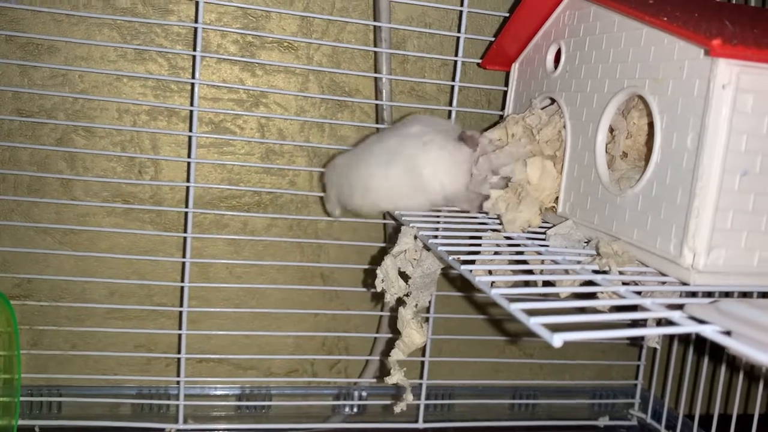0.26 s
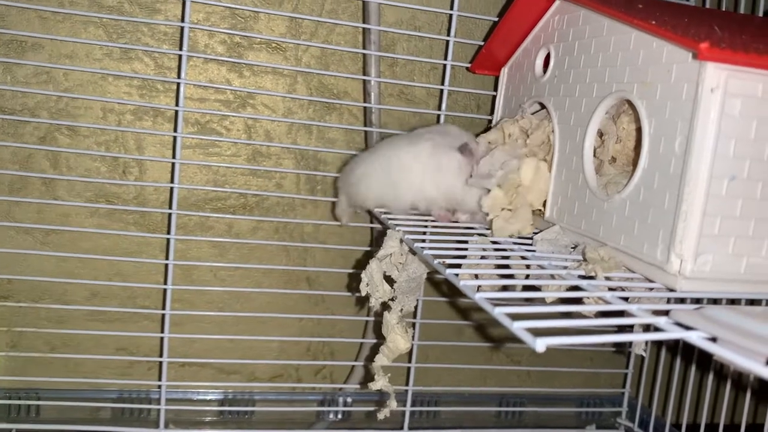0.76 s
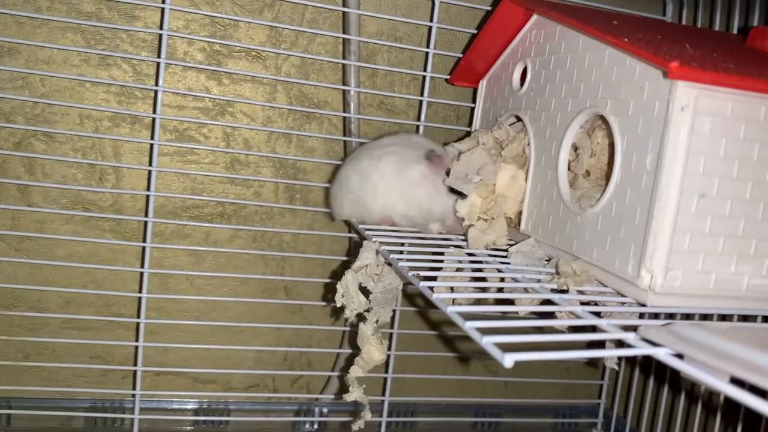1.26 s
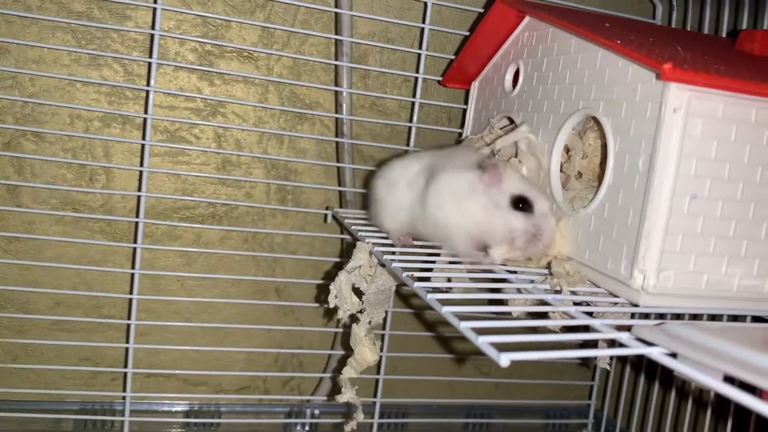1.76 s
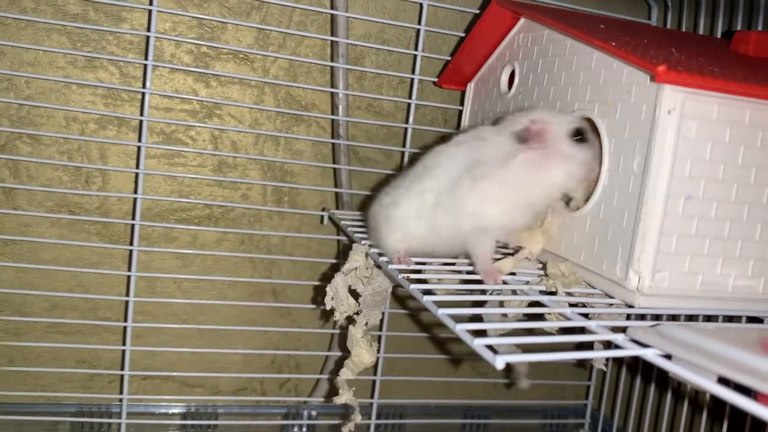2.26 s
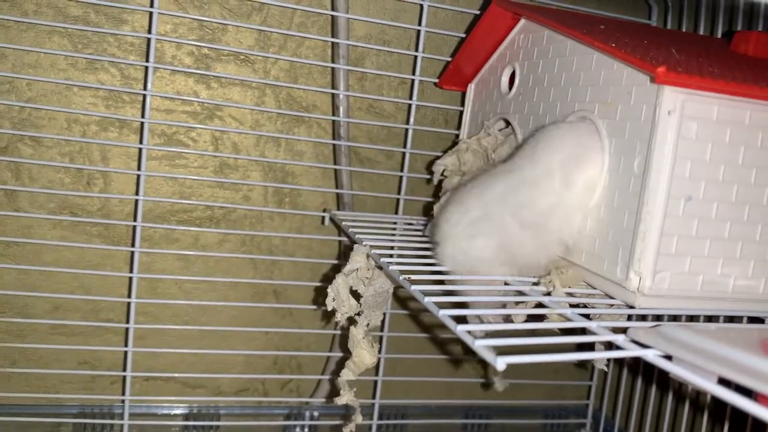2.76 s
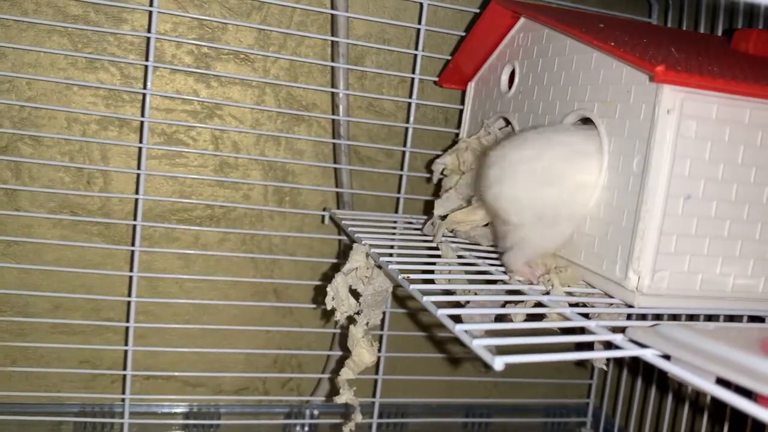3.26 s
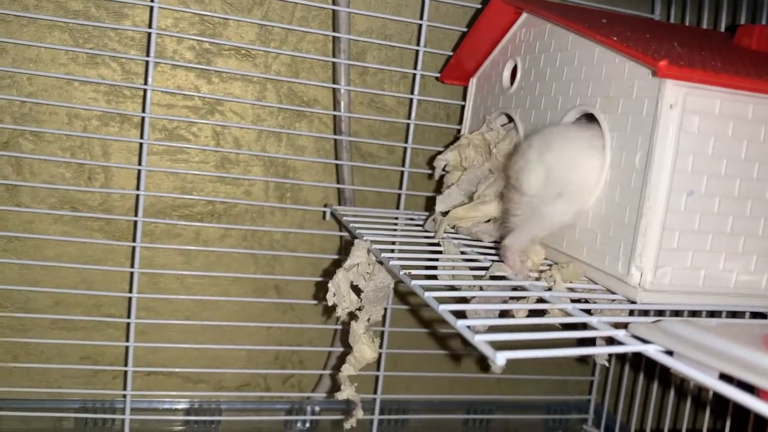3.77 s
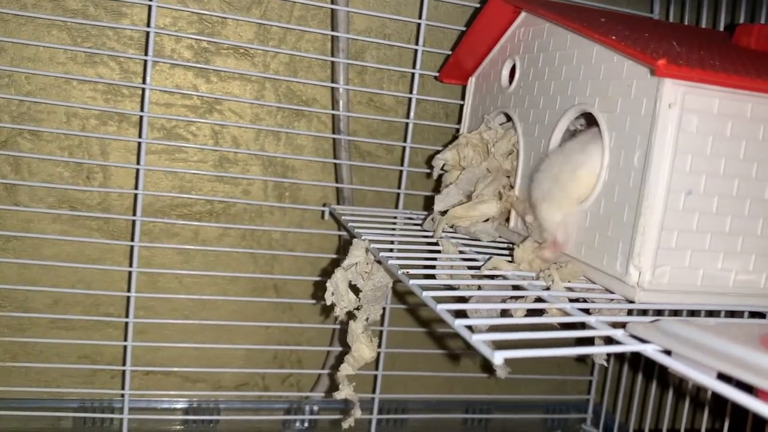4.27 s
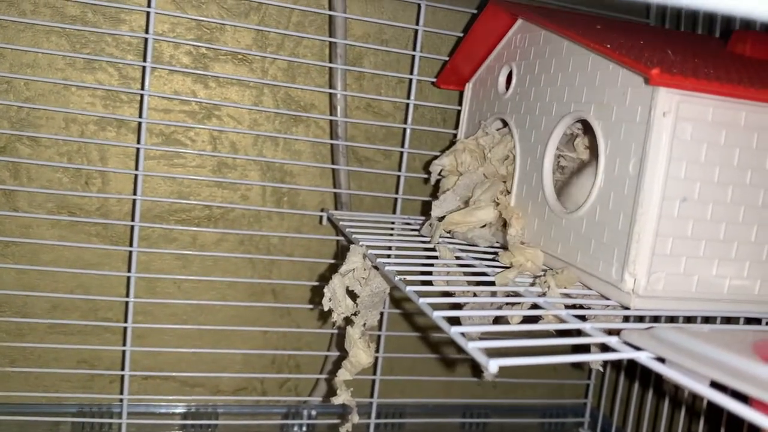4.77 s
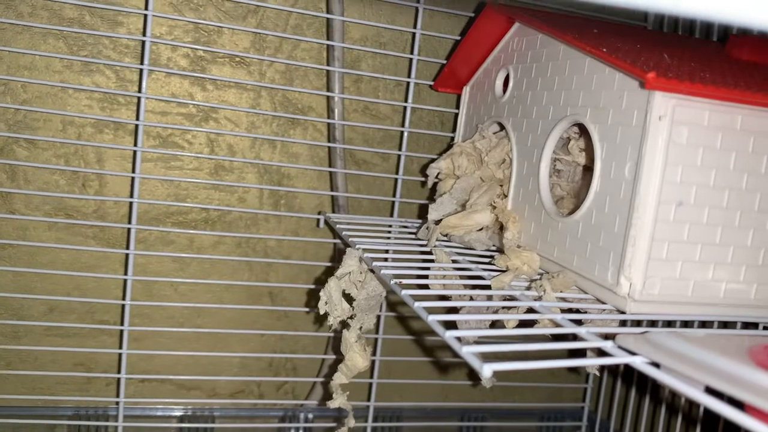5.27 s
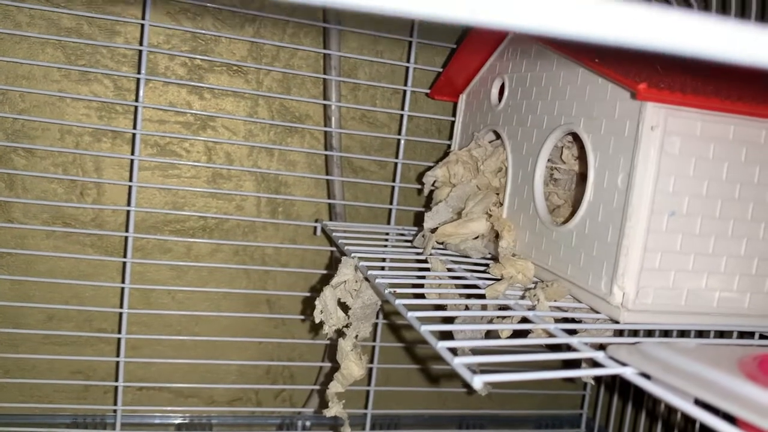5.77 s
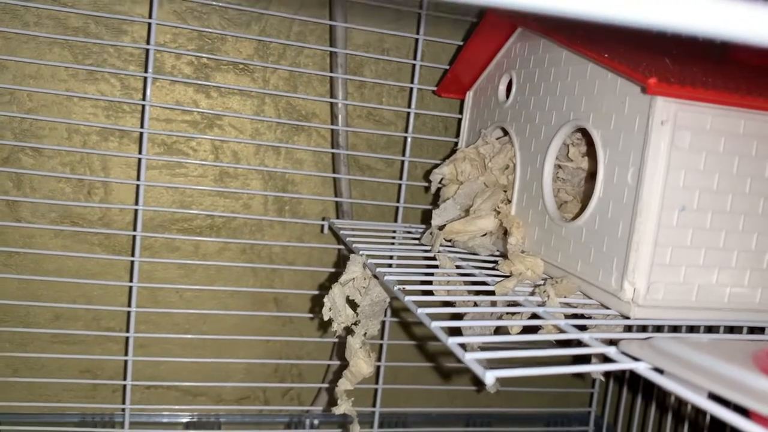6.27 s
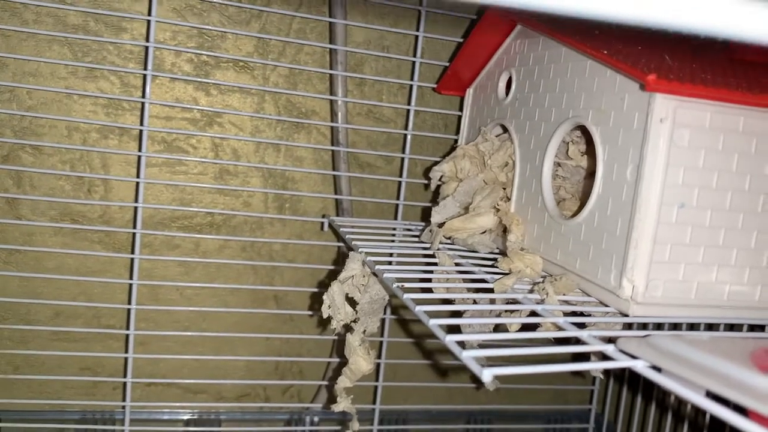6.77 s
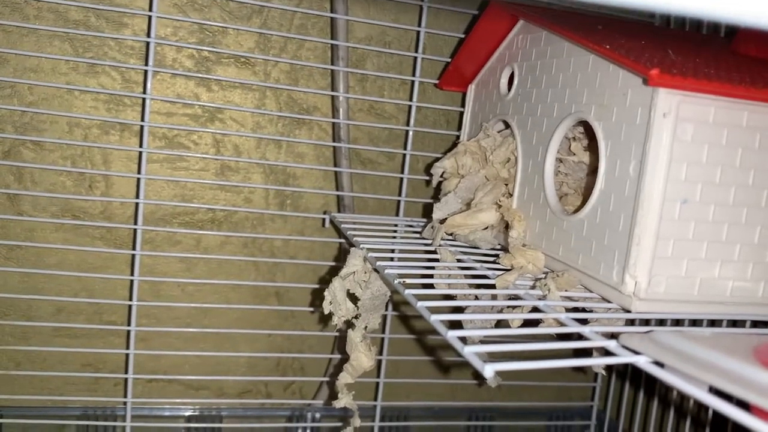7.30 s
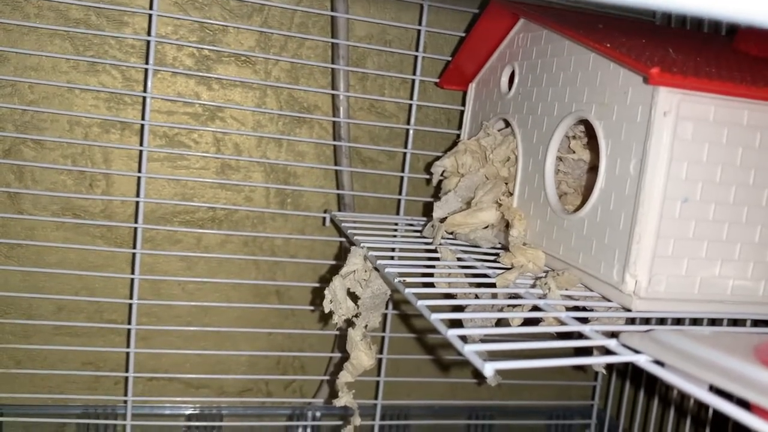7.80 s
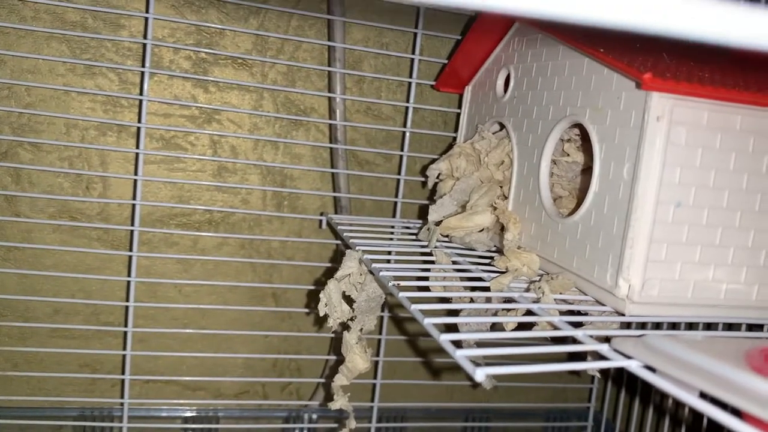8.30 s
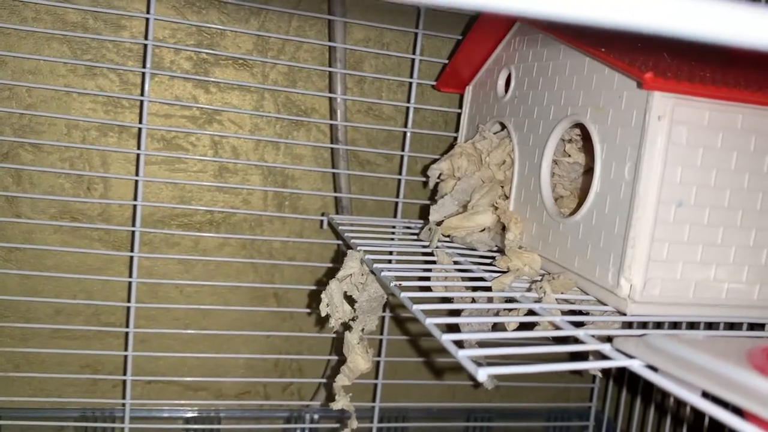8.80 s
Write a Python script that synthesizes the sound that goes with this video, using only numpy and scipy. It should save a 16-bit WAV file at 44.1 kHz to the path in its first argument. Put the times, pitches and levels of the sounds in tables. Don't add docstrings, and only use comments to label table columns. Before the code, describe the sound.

A small rodent rustles and snaps dry paper bedding with light paw bumps on wire and plastic, over a steady low electrical hum.

```python
import sys
import numpy as np
from scipy import signal
from scipy.fft import rfft, irfft, next_fast_len
from scipy.io import wavfile
from scipy.ndimage import uniform_filter1d

SR = 44100
rng = np.random.default_rng(int(sys.argv[2]) if len(sys.argv) > 2 else 0)


def natural_amplitude(level_db):
    exponent = np.asarray(level_db, float) / 20
    return 10 ** exponent


def digitize_waveform(pressure):
    field = np.atleast_2d(pressure).T
    bounded = np.clip(field, -1, 1)
    quanta = np.round(bounded * 32767).astype(np.int16)
    wavfile.write(sys.argv[1], SR, quanta)


N = 398884


def evened(x):
    return x / np.sqrt(np.mean(x ** 2) + 1e-20)


def read(points, hz):
    f, value = np.transpose(points)
    return np.interp(np.log(hz + 1), np.log(f + 1), value)


def curves(rows):
    s, *columns = np.transpose(rows)
    return [np.interp(np.arange(N) / SR, s, c) for c in columns]


def colour(x, points):
    size = next_fast_len(len(x))
    gain = natural_amplitude(read(points, np.fft.rfftfreq(size, 1 / SR)))
    return irfft(rfft(x, size) * gain, size)[:len(x)]


def resonate(x, hz, width_hz):
    b, a = signal.iirpeak(hz, hz / width_hz, SR)
    return signal.lfilter(b, a, signal.lfilter(b, a, x))


def drift(rate_hz):
    length = max(2, int(SR / 64 / rate_hz))
    steps = uniform_filter1d(rng.standard_normal(N // 64 + 2), length, mode="wrap")
    return np.interp(np.arange(N) / 64, np.arange(len(steps)), evened(steps))


def rattling(length, smooth, depth_db):
    waver = evened(uniform_filter1d(rng.standard_normal(length), smooth))
    return rng.standard_normal(length) * natural_amplitude(depth_db * waver)


def add(mix, s, sound):
    part = mix[round(s * SR):][:len(sound)]
    part += sound[:len(part)]


def tone(hz, db, lead_rad=0.38, lean_db=9.0, waver_db=1.0, rate_hz=3.3):
    turn = 2 * np.pi * (np.cumsum(hz * np.ones(N)) / SR + rng.random())
    size = np.sqrt(2) * natural_amplitude(db + waver_db * drift(rate_hz))
    left = np.sin(turn) * natural_amplitude(lean_db / 2)
    right = np.sin(turn - lead_rad) / natural_amplitude(lean_db / 2)
    return size * np.array([left, right])


# [t/s, level/dB]
MAINS_HUM = [(0, -47), (.75, -43.5), (1.7, -45), (2.7, -47), (3.7, -51), (4.7, -55.5), (5.2, -55),
             (5.8, -49.5), (6.5, -47.5), (7.1, -46.5), (7.6, -45), (8.2, -45.5), (8.6, -44.5), (9.04, -44)]
# [f/Hz, level/dB, waver width/Hz]
STEADY_TONES = [(99.7, -56.5, 0.77), (177.8, -67, 4)]
# [t/s, level/dB]
PUMP_TONE = [(0, -69.5), (1.6, -66), (2.3, -67.5), (3.3, -73.5), (3.8, -63.5), (4.9, -71), (5.5, -70),
             (6.2, -65), (7.2, -61), (7.7, -79), (9.04, -72)]
# [f/Hz, level/dB]
FAINT_TONES = [(1066, -93), (1550, -96), (2482, -102), (3413, -105), (4344, -108), (11278, -105),
               (11343, -104)]
# [t/s, f/Hz, level/dB]
SLOW_WHINE = [(0, 272, -63), (.6, 281, -70), (1.1, 291, -70), (1.4, 297, -61), (1.75, 303, -57),
              (2.25, 307.5, -59), (3, 310, -61), (4, 310.7, -61), (6.8, 311, -61), (7.3, 314.5, -56),
              (7.75, 319, -57), (8.25, 323, -59), (9.04, 318, -57)]
FAST_WHINE = [(0, 360.3, -65), (1.9, 360.2, -65), (2.3, 358.6, -65), (3.2, 356, -68), (4, 355, -68),
              (6, 355, -68), (6.7, 356.5, -66), (7.2, 359, -64), (7.6, 360.6, -64), (9.04, 360.4, -64)]
# [multiple, level/dB]
WHINE_OVERTONES = [(1, 1), (2, -24), (4, -29.5)]


def machines():
    strain, strain_from_db = 1.2, -56.5
    out = tone(120, curves(MAINS_HUM)[0], lead_rad=.65, lean_db=5, waver_db=.3)
    for hz, db, width_hz in STEADY_TONES:
        out += tone(hz + 0.36 * width_hz * drift(width_hz), db, 1.0, 3.5, 3.3, width_hz)
    out += tone(233.8 + 1.1 * drift(3), curves(PUMP_TONE)[0], 0.53, 5.2, 0.81, 3)
    for hz, db in FAINT_TONES:
        apart = hz < 6000
        out += tone(hz + 4 * drift(6), db + 3.5, -1.5 * apart, 6.0 * apart, 2.5, 5)
    hz, db = curves(SLOW_WHINE)
    for k, over_db in WHINE_OVERTONES:
        strain_db = (k > 1) * strain * (db - strain_from_db)
        out += tone(k * hz, db + over_db + strain_db, 0.81, 3.5, 1.0, 4.4)
    return out + natural_amplitude(2.5) * tone(*curves(FAST_WHINE), -.6, 6.0, .7, 4)


# [f/Hz, level/dB per Hz]
ROOM_SPECTRUM = [(22, -108), (40, -82.5), (62, -72.5), (190, -77.5), (270, -87), (420, -93.5),
                 (660, -103.5), (770, -108.5), (1000, -107.5), (2050, -117), (2550, -115.5), (3100, -120),
                 (6100, -125), (8500, -122), (11000, -122), (15500, -126)]


def room():
    swell = natural_amplitude(.5 * drift(3) + .6 * drift(25))
    noise = rng.standard_normal((2, N)) * np.sqrt(SR / 2) * swell
    return np.array([colour(n, ROOM_SPECTRUM) for n in noise])


def slips(per_s, spread_db, clump_db, clumps_per_s):
    size = natural_amplitude(spread_db * np.minimum(rng.exponential(1, N), 5))
    size = size * (rng.random(N) < per_s / SR)
    return size * np.sign(rng.random(N) - .5) * natural_amplitude(clump_db * drift(clumps_per_s))


# [t/s, length/s, level/dB, crumple share/dB, mid fold share/dB]
PAW_STROKES = [(0.0, 0.047, -80.5, -7, 1), (0.374, 0.047, -77, 0, 4), (0.436, 0.062, -74, 0, 1),
               (0.52, 0.2, -80, 1, 2), (0.717, 0.032, -71, -8, 0), (0.743, 0.05, -68.5, -4, -6),
               (0.82, 0.053, -77, 1, -8), (0.875, 0.08, -75, 1, -2), (1.34, 0.059, -75.5, -5, 1),
               (1.422, 0.065, -64.5, -7.5, 0), (1.491, 0.049, -61, -7.5, -2), (1.564, 0.067, -64, -2.5, -3),
               (1.693, .04, -68, -3.5, -3), (1.754, 0.13, -70.5, -2, -11), (1.893, 0.12, -71.5, -1, -10),
               (2.011, 0.097, -69.5, -3, -11), (2.11, .04, -79, -6, -4), (2.158, 0.06, -76, -2, 0),
               (2.22, 0.05, -70.5, -5, -2), (2.248, 0.058, -66.5, -7, -3), (2.314, 0.038, -66, 1, 6),
               (2.372, 0.06, -71.5, 1, -4), (2.44, .04, -80, -6, -2), (2.496, 0.03, -77, 0, 1),
               (2.62, 0.11, -78, 0, 1), (3.042, 0.044, -79, -1, -2), (3.385, .03, -81, -8, -4),
               (3.64, 0.049, -80, 0, -2), (3.868, 0.047, -79.5, -1, -1), (4.025, 0.06, -76, -5, -3),
               (4.195, 0.13, -82, -3, 0), (4.40, 0.074, -79.5, -4, 0), (4.59, 0.12, -82, 3, 0),
               (5.62, 0.12, -83, 0, 1)]


def effort():
    grip_s, pull_db, let_go_db_per_s = 0.0064, 1, 511
    out = np.zeros((N, 3))
    for s, length_s, db, deep_db, mid_db in PAW_STROKES:
        t = np.arange(0, length_s + .3, 1 / SR)
        pull = pull_db * (np.minimum(t / length_s, 1) - 1)
        release = let_go_db_per_s * np.maximum(t - length_s, 0)
        shape = natural_amplitude(db + pull - release) * np.minimum(t / grip_s, 1)
        add(out, s, np.outer(shape, natural_amplitude([0, deep_db, mid_db])))
    return out.T


# [f/Hz, level/dB]
PAPER_SPECTRUM = [(1500, -34), (3800, -14), (4500, -5), (5300, -12), (5800, -6.5), (6700, -2), (7900, -5),
                  (8600, 5), (11000, 2), (13500, 3), (15500, 1.5)]
CRUMPLE_SPECTRUM = [(500, -7.5), (1000, 2.5), (1800, -2), (2400, -1), (3300, -6), (4400, -11), (5200, -17),
                    (6000, -49)]
# [f/Hz, width/Hz, level/dB]
PAPER_FOLDS = [(3300, 310, -17.5), (4310, 290, -19.5), (8950, 410, -7)]


def rustle():
    crisp, deep, mid = effort()
    paper = natural_amplitude(1.5) * evened(colour(slips(2400, 2.6, 2.6, 90), PAPER_SPECTRUM))
    for hz, width_hz, db in PAPER_FOLDS:
        paper += natural_amplitude(db) * evened(resonate(slips(1500, 5.3, 2.8, 11), hz, width_hz))
    crumple = natural_amplitude(-0.5) * evened(colour(slips(2500, 1.2, 1.2, 40), CRUMPLE_SPECTRUM))
    mid_fold = natural_amplitude(-7.5) * evened(resonate(slips(2000, 3.2, 4.9, 21), 7000, 1700))
    return crisp * paper + deep * crumple + mid * mid_fold


# [t/s, peak/dB, low body share/dB, f/Hz]
PAPER_SNAPS = [(0.035, -65, -37, 10400), (0.0942, -59, -33, 6500), (0.3885, -65, -15, 6700),
               (.4424, -65, -30, 10300), (0.49, -64, -14, 8000), (.6404, -59, -25, 7100),
               (0.715, -63, -20, 7500), (0.7446, -59, -25, 10000), (0.8826, -65, -8, 4500),
               (0.9495, -59, -16, 9700), (1.3865, -47, -30, 10500), (1.4092, -63, -13, 3500),
               (1.4307, -49, -21, 9500), (1.446, -50, -36, 9000), (1.465, -51, -34, 11300),
               (1.501, -54, -25, 10000), (1.523, -51, -30, 11500), (1.539, -54, -30, 10500),
               (1.561, -52, -28, 10500), (1.7195, -57, -13, 7000), (1.773, -57, -30, 14600),
               (1.853, -53, -19, 11500), (1.826, -60, -20, 4500), (1.966, -57, -30, 11000),
               (1.976, -57, -30, 10500), (1.992, -59, -30, 10000), (2.0214, -50, -24, 12500),
               (2.027, -55, -24, 11000), (2.0812, -52, -30, 10900), (2.089, -54, -30, 10500),
               (2.098, -41.5, -30, 11500), (2.176, -57, -14, 8000), (2.2573, -36, -30, 11500),
               (2.277, -48, -36, 10300), (2.283, -45.5, -38, 7950), (2.3206, -59, -30, 6500),
               (2.3455, -54, -27, 7000), (2.3805, -57, -32, 11400), (2.4205, -55, -14, 6900),
               (2.506, -61, -17, 10600), (2.6484, -60, -18, 12200), (2.167, -64, -14, 4000),
               (3.048, -66, -12, 7000), (3.076, -63, -12, 7000), (4.1894, -66, -20, 9000),
               (4.2193, -65, -26, 9000), (4.3715, -72, -8, 5000), (6.122, -64, -10, 5000),
               (8.011, -67, -13, 8000)]


def snaps():
    t60_s, rise_s, crack_db, q, peak_db = .014, .0007, 11.0, 1.8, -9.5
    out, t = np.zeros(N), np.arange(4096) / SR
    crack = crack_db * np.exp(-t / 0.0022)
    rise = np.minimum(t / rise_s, 1) ** 2
    for s, db, body_db, hz in PAPER_SNAPS:
        burst = rng.standard_normal(len(t))
        pitch = natural_amplitude(peak_db) * evened(resonate(burst, hz, hz / q))
        crisp = evened(evened(colour(burst, PAPER_SPECTRUM)) + pitch)
        body = natural_amplitude(min(body_db, -8) + 4.5) * evened(colour(burst, CRUMPLE_SPECTRUM))
        add(out, s, natural_amplitude(db - 5.5 - 60 * t / t60_s + crack) * (crisp + body) * rise)
    return out


# [t/s, peak/dB, ring f/Hz, treble share/dB, wall share/dB]
PAW_BUMPS = [(0.28, -64, 850, -36, -2), (0.612, -56, 1110, -30, 0), (0.882, -49, 640, -27, 3),
             (0.949, -54, 1000, -38, 0), (1.697, -56, 640, -29, -3.5), (1.708, -50, 630, -27, -3.5),
             (2.168, -61, 640, -22, 0), (2.333, -58, 1180, -27, -8), (2.966, -62, 615, -26, 0),
             (7.616, -63, 564, -33, -4), (8.466, -54, 1660, -18, -11), (8.472, -42, 645, -20, -11)]
# [f/Hz, width/Hz, level/dB]
SHELF_MODES = [(1140, 120, -1), (1630, 170, 8), (2030, 200, 1), (2420, 450, 1), (3010, 200, 2.5),
               (3470, 270, 5.5), (4150, 300, -4), (4870, 280, 0), (5300, 280, -0.5), (6300, 800, -14.5),
               (7370, 350, -7), (10200, 300, -1.5), (10650, 330, -5), (11500, 500, -16)]


def bumps():
    rise_s, t60_s, wire_damp_db_per_s_khz = 0.0021, 0.22, 17
    hollow_rise_s, hollow_damp_db_per_s = 0.009, 128
    out, t = np.zeros(N), np.arange(14000) / SR
    swell = (1 - np.exp(-(t / hollow_rise_s) ** 2)) * natural_amplitude(1.5 - hollow_damp_db_per_s * t)
    rise = 1 - np.exp(-(t / rise_s) ** 2)
    for s, db, hz, treble_db, wall_db in PAW_BUMPS:
        push = rattling(len(t), 150, 1.3)
        walls = 0.56 * resonate(push, 1260, 380) + 0.78 * resonate(push, 977, 417)
        hollow = resonate(push, hz, 130) + natural_amplitude(wall_db) * walls
        hollow += 1.3 * resonate(push, 601, 80) + 1.07 * resonate(push, 525, 70)
        wires = np.zeros(len(t))
        for f, width_hz, gain_db in SHELF_MODES:
            damp_db = wire_damp_db_per_s_khz * t * f / 1000
            wires += natural_amplitude(gain_db - damp_db) * resonate(push, f, width_hz)
        wires *= natural_amplitude(treble_db + 10.0) / np.std(wires[:1000])
        fade = natural_amplitude(db - 3.5 - 60 * (t / t60_s) ** 1.3)
        add(out, s, fade * (swell * evened(hollow) + wires) * rise)
    return out


# [t/s, length/s, f/Hz, level/dB]
FOLD_RINGS = [(1.41, 0.078, 4440, -81), (1.5, .05, 4500, -78), (1.575, .07, 4300, -90),
              (1.826, 0.068, 4550, -79), (1.92, .02, 4300, -81), (2.035, 0.066, 4450, -81),
              (2.297, .06, 4640, -87), (2.41, 0.037, 4500, -88), (2.449, 0.043, 4450, -78),
              (0.765, 0.087, 4530, -78)]


def fold_rings():
    out = np.zeros(N)
    for s, length_s, hz, db in FOLD_RINGS:
        sound = evened(resonate(rng.standard_normal(6000), hz, 260))[:int(length_s * SR)]
        add(out, s, natural_amplitude(db) * sound * signal.windows.tukey(len(sound), .5))
    return out


# [t/s, peak/dB, length/s]
HOUSE_SCRAPES = [(2.616, -75, 0.13), (3.63, -79, 0.11), (4.0494, -85, 0.082), (4.281, -78, 0.1),
                 (4.382, -74.5, 0.15), (4.63, -75, 0.1), (4.838, -77, 0.1), (5.65, -77, 0.14),
                 (6.6115, -72.5, 0.12)]


def scrapes():
    out = np.zeros(N)
    for s, db, length_s in HOUSE_SCRAPES:
        drag = rattling(8000, 200, 1.5)
        sound = evened(resonate(drag, 1950, 1900))[:int(length_s * SR)]
        add(out, s - .02, natural_amplitude(db) * sound * np.hanning(len(sound)))
    return out


def cage(x):
    t = np.arange(6000) / SR
    t60_s = np.array([[.09], [.04]])
    tail, scatter = rng.standard_normal((2, len(t))) * natural_amplitude(-60 * t / t60_s)
    near = x + natural_amplitude(-19) * signal.oaconvolve(x, tail / np.linalg.norm(tail))[:N]
    scatter = rfft(scatter[:1536])
    even = irfft(scatter / abs(scatter))
    return np.array([near, signal.oaconvolve(near, even)[:N]])


# [f/Hz, level/dB]
PORT_LEAN = [(60, -.5), (100, 4.5), (200, 3), (500, 7), (1300, 8.5), (2400, 4.5), (4400, 1.5), (6200, -1),
             (8000, 0)]
# [f/Hz, phase/rad]
PORT_LEAD = [(0, 3), (45, 2.1), (100, 1), (200, .8), (410, -.3), (520, 0), (690, -.9), (1030, -.9),
             (2060, -2.8), (6200, -6.3)]


def ports(pair, likeness):
    treble_delay_s = 1 / 4800
    size = next_fast_len(N)
    hz = np.fft.rfftfreq(size, 1 / SR)
    first, second = rfft(pair, size)
    same = np.clip(read(likeness, hz), 0, 1)
    lean = natural_amplitude(read(PORT_LEAN, hz) / 2)
    treble_turn = 2 * np.pi * np.maximum(hz - 6200, 0) * treble_delay_s
    late = np.exp(1j * (treble_turn - np.interp(hz, *np.transpose(PORT_LEAD))))
    right = same * late * first + np.sqrt(1 - same ** 2) * second
    return irfft([first * lean, right / lean], size)[:, :N]


# [f/Hz, likeness/0-1]
ROOM_LIKENESS = [(30, .62), (75, .6), (145, .8), (410, .68), (1030, .55), (1500, .15), (5700, .15),
                 (6700, .4), (7600, .6), (8600, .9), (13400, .95), (15000, .75)]
ANIMAL_LIKENESS = [(500, .25), (1030, .7), (1600, .4), (2100, .2), (5500, .25), (6100, .9), (7400, .8),
                   (8400, .98), (13400, .99), (15000, .93)]


def scene():
    animal = cage(rustle() + snaps() + bumps() + fold_rings() + scrapes())
    return machines() + ports(room(), ROOM_LIKENESS) + ports(animal, ANIMAL_LIKENESS)


def roll_off(x):
    return signal.sosfilt(signal.butter(12, 16510, fs=SR, output="sos"), x)


def record(dry):
    taps = signal.firwin(511, 15600, window=("kaiser", 9), fs=SR)
    limited = signal.oaconvolve(dry, taps[None], "same")
    return roll_off(limited)


dry = scene()
out = record(dry)
digitize_waveform(out)
```